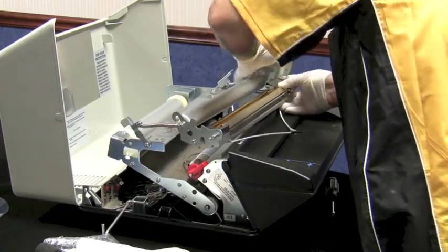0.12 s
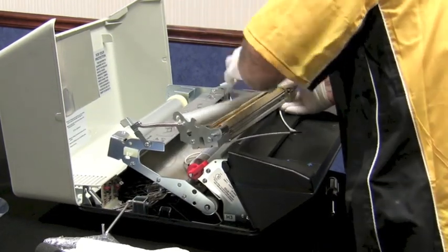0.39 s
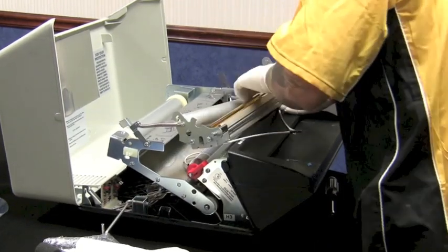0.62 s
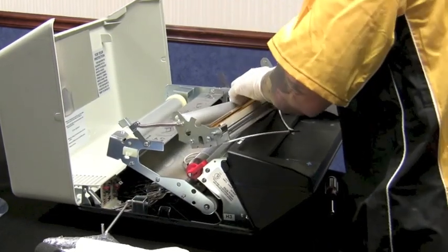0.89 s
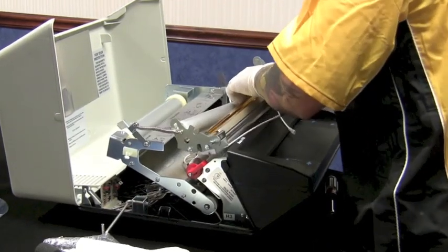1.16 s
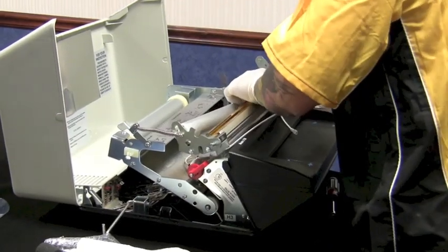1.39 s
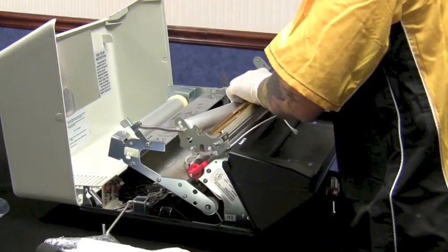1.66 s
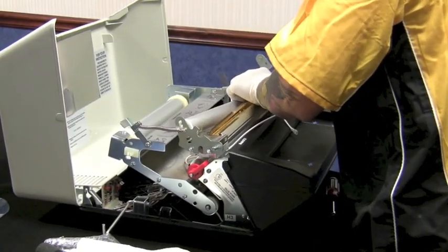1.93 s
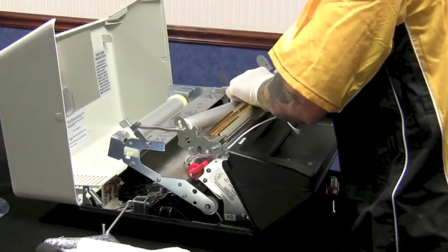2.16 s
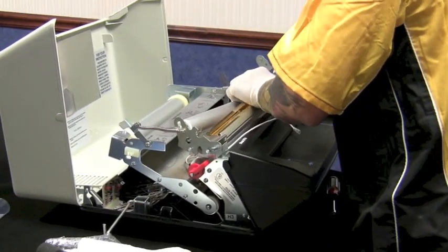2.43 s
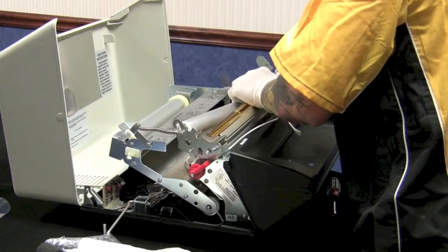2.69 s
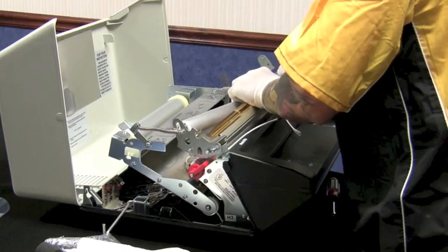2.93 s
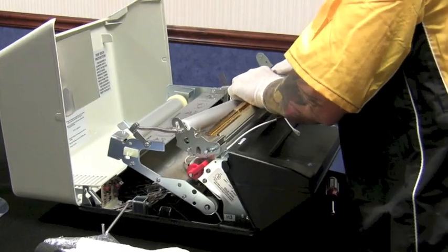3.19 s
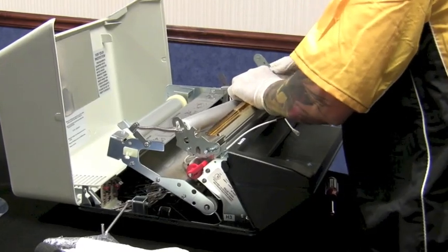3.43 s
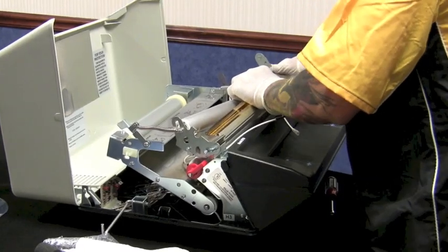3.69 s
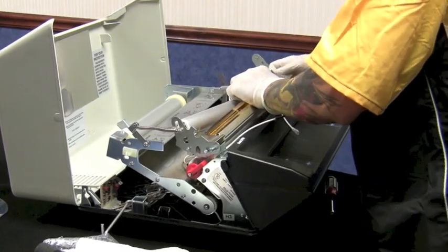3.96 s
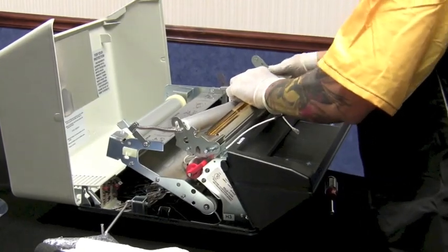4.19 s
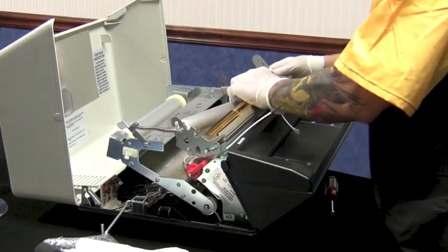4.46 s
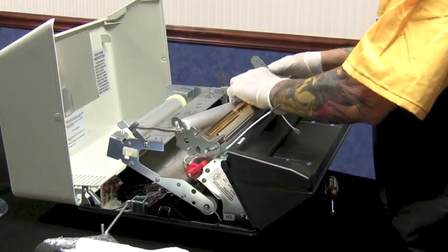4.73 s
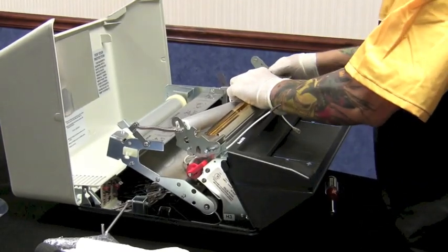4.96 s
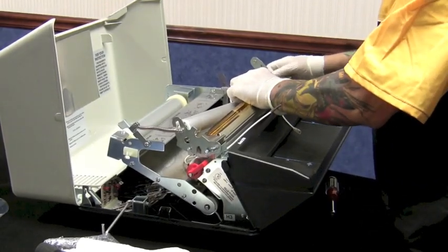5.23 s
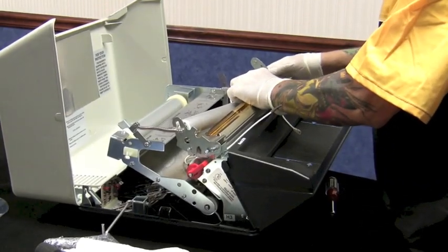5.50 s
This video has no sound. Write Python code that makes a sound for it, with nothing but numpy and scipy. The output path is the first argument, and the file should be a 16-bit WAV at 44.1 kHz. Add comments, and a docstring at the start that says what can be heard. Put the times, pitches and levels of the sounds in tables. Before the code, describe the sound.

Hands fit a roller assembly into an open metal machine. A rattle and scrape lead to a loud steel clank at half a second, then a lull, small ringing knocks, a busier cluster of clatter around two to three seconds, and sparse ticks afterwards. Close stereo pickup in a small carpeted room with soft ventilation and faint hum.

```python
"""A small carpeted room with ventilation noise, heard by a stereo microphone two metres from an open cabinet.
Gloved hands lower a roller assembly into the cabinet and seat it: sliding parts rub as gritty noise,
the roller and its brackets tick and rattle, the sheet cabinet knocks, a steel lever clanks, a tray rings.
Each blow is a rattling burst heard as a noise crack and as ringing modes; a bracket squeaks in a short glide.
The room adds a diffuse tail to the parts; the air is coloured noise over a wavering hum."""
import sys
import numpy as np
from scipy import signal
from scipy.fft import rfft, irfft
from scipy.io import wavfile
from scipy.ndimage import uniform_filter1d

SR = 44100
rng = np.random.default_rng(int(sys.argv[2]) if len(sys.argv) > 2 else 0)


def store_pcm(level_fs):
    """Save levels as 16-bit WAV."""
    pcm = np.round(np.clip(level_fs, -1, 1) * 32767).astype(np.int16)
    wavfile.write(sys.argv[1], SR, np.atleast_2d(pcm).T)


def voltage_ratio(decibels):
    """Convert decibels (scalar or array-like) to amplitude ratios, 20 dB per decade."""
    exponent = np.asarray(decibels, float) / 20
    return 10 ** exponent


N = 247401  # length of the scene in samples
RING = 24000  # samples kept of each ring and of the room tail


def unit(x):
    """Scales a sound to rms 1."""
    return x / np.sqrt(np.mean(x ** 2))


def at_hz(table, hz):
    """Reads a table of (frequency [Hz], value) on a log-frequency axis."""
    table_hz, value = np.transpose(table)
    return np.interp(np.log(hz + 1), np.log(table_hz), value)


def noise(table, size=N):
    """Noise of rms 1 with the table's colour."""
    hz = np.fft.rfftfreq(size, 1 / SR)
    spectrum = rfft(rng.standard_normal(size)) * voltage_ratio(at_hz(table, hz))
    return unit(irfft(spectrum, size))


def walk(rate):
    """Random levels held 1 / rate seconds and slewed twice; spread near 1."""
    k = int(SR / rate)
    steps = np.repeat(rng.standard_normal(N // k + 1), k)
    return 1.4 * uniform_filter1d(uniform_filter1d(steps, k), k)[:N]


def near(hz, centre, octaves):
    """A bell around a centre frequency, its width in octaves."""
    return np.exp(-.5 * (np.log2(hz / centre) / octaves) ** 2)


def peak(x):
    """Highest short-term rms, over 150 samples."""
    return np.sqrt(uniform_filter1d(x ** 2, size=150).max())


def strike(blows, modes, split, scatter_db, rise_s, grain_db, crack_oct, focus_oct):
    """Each blow is a short uneven rattle: heard as a crack, and ringing the part's modes."""
    hz, mode_db, t60 = np.repeat(np.transpose(modes), repeats=3, axis=1)
    # an imperfect part splits every mode into close neighbours that beat
    hz = hz * (1 + split * rng.standard_normal(len(hz)))
    t = np.arange(RING) / SR
    rings = np.exp(np.outer(2j * np.pi * hz - np.log(1000) / np.clip(t60, .02, .8), t))
    bins = np.fft.rfftfreq(RING, 1 / SR) + 1
    out = np.zeros(N + 2 * RING)
    for s, db, ring_hz, centre, rattle, ring_db in blows:
        # the contact chatters: a decaying push broken into millisecond grains
        grain_levels = np.repeat(rng.standard_normal(RING // 40), 40)
        grains = uniform_filter1d(voltage_ratio(grain_db * grain_levels), size=20)
        rise = 1 - np.exp(-t / (rise_s + 0.11 * rattle))
        push = rise * np.exp(-t / max(rattle, .0005)) * grains

        # the crack is the broader the harder the blow, lifted where the touched piece resonates
        broad = near(bins, 1000 * 2 ** centre, crack_oct * voltage_ratio(0.027 * (db + 24.0)))
        colour = broad + 0.86 * near(bins, ring_hz, 0.16)
        crack = push * unit(irfft(rfft(rng.standard_normal(RING)) * colour, RING))

        # a harder blow reaches more of the modes; dividing by the drive evens out the chatter's spectrum
        force = push * rng.standard_normal(RING)
        drive = np.interp(hz, bins, np.abs(rfft(force))) / np.linalg.norm(force)
        reach = near(hz, ring_hz, focus_oct * voltage_ratio(0.61 * (db + 31.0)))
        level_draw, phase_draw = rng.standard_normal((2, len(hz)))
        gains = voltage_ratio(mode_db + scatter_db * level_draw) * (reach + 0.024)
        gains = gains * np.exp(2j * phase_draw) / (drive + 0.09)
        ring = signal.fftconvolve(force, (gains @ rings).imag)[:RING]

        sound = crack / peak(crack) + voltage_ratio(ring_db) * ring / peak(ring)
        start = int(s * SR)
        out[start:start + RING] += voltage_ratio(db) * sound / peak(sound) / 2
    return out[:N]


# ventilation colour in the middle: (frequency [Hz], relative level per Hz [dB])
AIR_COLOUR = [(53, -36), (90, -13.5), (151, 2), (316, -2.5), (521, -4), (593, -0.5), (1290, -11),
              (3660, -18.5), (11300, -30), (14300, -37), (16000, -58)]
# width of the ventilation noise: (frequency [Hz], side over mid [dB])
AIR_WIDTH = [(30, -5), (60, 17), (130, 6), (300, 12), (700, 5), (1500, 7), (3000, 4.5), (7000, -4.5),
             (15000, 1)]
# mains hum as a narrow hump of noise: (frequency [Hz], relative level per Hz [dB])
HUM_COLOUR = [(20, -22), (42, -18), (54, -15), (60, 2.5), (67, -11.5), (95, -9), (130, -32)]
AIR_DB, HUM_DB, HUM_SIDE_DB = -54, -66.5, 5  # rms of air and hum in the middle; hum's side over mid


def air():
    """Ventilation noise over a wavering mains hum, each with independent mid and side."""
    hz = np.fft.rfftfreq(N, 1 / SR)
    side_colour = [(f, db + at_hz(AIR_WIDTH, f)) for f, db in AIR_COLOUR]
    mid_power = np.mean(voltage_ratio(2 * at_hz(AIR_COLOUR, hz)))
    side_power = np.mean(voltage_ratio(2 * at_hz(side_colour, hz)))
    side = np.sqrt(side_power / mid_power) * noise(side_colour)
    ventilation = voltage_ratio(AIR_DB) * np.array([noise(AIR_COLOUR), side])
    hum_colour = HUM_COLOUR + [(300, -90)]
    hum = np.array([noise(hum_colour), noise(hum_colour)])
    return ventilation + voltage_ratio([[HUM_DB], [HUM_DB + HUM_SIDE_DB]]) * hum


# sliding strokes: (time of full pressure [s], hold [s], rubbing hiss level [dB], cabinet shudder level [dB])
SLIDING_STROKES = [(0, 0.0053, -34, -48.5), (0.247, 0.037, -48.5, -51.5), (.48, .01, -50, -55),
                   (.6, .05, -53.5, -52.5), (1.175, .06, -46, -45), (1.645, .05, -65, -50),
                   (1.8, .08, -56, -56), (2.0, .08, -52, -55), (2.165, .06, -34, -47),
                   (2.24, .04, -41, -50), (2.45, .09, -52, -53), (2.63, 0.064, -43.5, -49.5),
                   (2.8, .04, -53, -58), (2.97, .08, -51, -65), (3.115, .03, -55, -46),
                   (3.165, .05, -37, -50), (3.44, .04, -52, -65), (3.55, .08, -54, -68),
                   (3.68, .14, -51, -56), (4.07, .11, -50, -54), (4.22, .03, -52, -55),
                   (4.42, .04, -55, -62), (4.48, .07, -48, -69), (4.592, .02, -46, -47),
                   (4.952, .12, -49.5, -56), (5.14, .05, -53, -55.5), (5.31, .05, -54, -56),
                   (5.42, .045, -40, -55)]
PRESS_DB_PER_S = 500  # rise of a stroke


def pressure(level_db, fall_db_per_s):
    """Every stroke swells, holds and eases off; overlapping strokes add in power."""
    s, hold = np.transpose(SLIDING_STROKES)[:2, :, None]
    t = np.arange(N) / SR - s
    rise_db = PRESS_DB_PER_S * np.minimum(t, 0)
    fall_db = fall_db_per_s * np.maximum(t - hold, 0)
    return np.sqrt(np.sum(voltage_ratio(2 * (level_db[:, None] + rise_db - fall_db)), axis=0))


def damped_ring(modes, t60_factor):
    """A part's modes ringing together, damped to a fraction of their free decay time."""
    t = np.arange(RING) / SR
    return sum(voltage_ratio(db) * np.sin(2 * np.pi * hz * t) * np.exp(-np.log(1000) * t / (t60_factor * t60))
               for hz, db, t60 in modes)


# colour of the rubbing hiss: (frequency [Hz], relative level per Hz [dB])
RUB_COLOUR = [(350, -4.5), (600, -5), (1230, -13), (1700, -12.5), (4710, -23.5), (9350, -26), (13500, -32),
              (15800, -38)]
EASE_DB_PER_S, SETTLE_DB_PER_S = 150, 70  # fall of a stroke's hiss; fall of its shudder


def slide():
    """Rubbing is gritty hiss; the same contact shakes the cabinet's modes."""
    hiss_db, shudder_db = np.transpose(SLIDING_STROKES)[2:]
    grit = unit(noise(RUB_COLOUR) * voltage_ratio(0.58 * walk(300) + 4.9 * walk(30)))
    # sparse catches in the grit make the roller jingle faintly
    catches = rng.standard_normal(N) * voltage_ratio(7.2 * rng.exponential(size=N)) * (rng.random(N) < .01)
    jingle = signal.fftconvolve(np.tanh(catches / 30), damped_ring(ROLLER_MODES, 0.39))[:N]
    grit = unit(grit + voltage_ratio(-17) * unit(jingle))
    shaking = rng.standard_normal(N) * voltage_ratio(4.1 * walk(40))
    shudder = unit(signal.fftconvolve(shaking, damped_ring(CABINET_MODES, 0.48))[:N])
    return pressure(hiss_db, EASE_DB_PER_S) * grit + pressure(shudder_db, SETTLE_DB_PER_S) * shudder


# roller blows: (time [s], relative level [dB], frequency ringing most [Hz],
# crack centre above 1 kHz [octaves], ring against crack [dB])
ROLLER_HITS = [(.001, -24.5, 5830, 1.9, -10.5), (.1116, -35.5, 2750, 1.8, -5),
               (0.2073, -33.5, 3760, 1.2, -12), (0.2572, -41, 3870, .63, -22), (.2874, -44, 3810, 2.8, -15),
               (.4354, -48, 5800, 3.2, -5), (.8679, -51, 5870, 1.6, -9), (.8874, -40.5, 2440, 0.89, -7),
               (1.1361, -35.5, 6600, 1.3, -14), (1.1626, -26, 1940, 1.3, -20), (1.261, -45, 6700, 1.8, -16),
               (1.3099, -41.5, 6100, 1, -16), (1.4865, -40, 2630, 1.1, -23), (1.942, -46, 2690, 2.4, -4),
               (2.065, -39, 2290, 2.9, -8), (2.1353, -15.5, 3660, 1.5, -6), (2.1694, -24.5, 3640, 0.58, -3),
               (2.196, -27, 5100, 1.6, -17), (2.4319, -35.5, 3300, 1.6, -12), (2.575, -29.5, 3640, 2, -7),
               (2.6343, -29.5, 3530, 1.5, -6), (2.6665, -31, 2390, 1.3, -18), (2.7731, -37, 7980, 1, -15),
               (2.821, -40.5, 5660, 0.78, -8), (2.8944, -35, 3730, 1.45, -17), (2.974, -38, 9380, 2.8, -10),
               (3.15, -22, 5600, 1.87, -6), (3.157, -19, 7200, 2.5, 0), (3.19, -23, 6000, 1.57, -20),
               (3.4294, -29, 2120, 1.22, -24), (3.487, -40, 2410, 1.5, -15),
               (3.7753, -43.5, 9610, 1.7, -12), (3.8206, -39, 3480, 0.78, -27),
               (3.8728, -46, 4370, 1.7, -24), (4.0377, -44, 3650, 1.6, -19), (4.0996, -46, 2670, 2.3, 0),
               (4.1734, -44, 2800, 1.7, -14), (4.2106, -42, 2570, 2.3, -18), (4.4722, -41, 2600, 1.4, -16),
               (4.5731, -26.5, 2140, .82, -14), (4.721, -37.5, 5200, 1.4, -5),
               (4.9422, -46, 3660, 1.7, -13), (4.9802, -34.5, 2530, 0.84, -17),
               (5.0794, -47, 9400, 4.1, -9), (5.2998, -34, 2660, 1.4, -16), (5.4051, -28, 2400, 1.4, -11),
               (5.4562, -33, 4500, 2, -17)]
# dry ticks, single brief contacts: # (time [s], relative level [dB], frequency ringing most [Hz], crack centre
# above 1 kHz [octaves])
DRY_TICKS = [(.2205, -37, 9600, 2.6), (1.4022, -40, 10700, 3.1), (1.4122, -34.5, 8550, 3.1),
             (1.6314, -38, 2380, 2.6), (2.4544, -35, 9000, 2.9), (2.9562, -34, 9610, 2.4),
             (3.034, -29.5, 2350, 1.05), (3.663, -30, 2300, .95), (3.718, -41, 5100, 2.1),
             (5.1173, -36.5, 3220, 2.1)]
# roller modes: (frequency [Hz], relative level [dB], free decay by 60 dB [s])
ROLLER_MODES = [(1950, -9, .07), (2290, -6, .07), (2640, -8, .08), (3260, -10, .1), (3400, -9, .14),
                (3590, -3, .16), (3680, -4, .16), (4620, -10, .13), (5360, -11, .18), (5520, -12, .13),
                (5940, -12, .1), (6760, -6, .2), (7470, -11, .15), (7660, -10, .18), (7890, -6, .22),
                (8800, -10, .14), (9640, -11, .15), (9940, -11, .18), (11140, -10, .2), (11540, -15, .12),
                (12430, -17, .1)]
ROLLER_RATTLE_S, HARD_BLOW_DB, REBOUND_S_PER_DB = 0.0083, -28, .0009  # harder blows rattle longer
TICK_RATTLE_S, TICK_RING_DB = .003, -23  # rattle decay; ring against crack


def roller():
    """The roller and its brackets rattle, longer after hard blows, and tick drily in the treble."""
    blows = []
    for s, db, hz, crack, ring in ROLLER_HITS:
        rattle = ROLLER_RATTLE_S + REBOUND_S_PER_DB * max(db - HARD_BLOW_DB, 0)
        blows.append((s, db, hz, crack, rattle, ring))
    blows += [(s, db, hz, crack, TICK_RATTLE_S, TICK_RING_DB) for s, db, hz, crack in DRY_TICKS]
    return strike(blows, ROLLER_MODES, split=0.0097, scatter_db=3.5, rise_s=0.0007, grain_db=4.1,
                  crack_oct=1.05, focus_oct=0.54)


# cabinet knocks: (time [s], relative level [dB], frequency ringing most [Hz], rattle decay [s])
CABINET_KNOCKS = [(.009, -38, 650, 0.0068), (.249, -40, 991, .012), (.499, -22, 1010, .024),
                  (1.163, -29, 554, 0.027), (1.219, -31.5, 346, 0.018), (1.489, -37, 690, .03),
                  (1.961, -24.5, 504, 0.011), (2.143, -22, 420, .02), (2.205, -18, 352, 0.017),
                  (2.48, -33.5, 510, .016), (2.573, -26.5, 700, 0.02), (2.666, -32.5, 990, 0.028),
                  (3.107, -27.5, 660, 0.0053), (3.159, -27.5, 620, 0.0097), (3.289, -43.5, 156, .006),
                  (4.049, -34, 950, 0.034), (4.212, -34, 982, .012), (4.315, -37, 158, 0.027),
                  (4.474, -33, 1020, 0.0076), (4.573, -32.5, 1040, .01), (4.976, -35, 686, 0.028),
                  (5.059, -36, 332, 0.02), (5.159, -42, 704, .013), (5.349, -39, 224, 0.018),
                  (5.411, -30, 1010, .017), (5.459, -38, 680, .018)]
# cabinet modes: (frequency [Hz], relative level [dB], free decay by 60 dB [s])
CABINET_MODES = [(157.6, 0.5, 0.29), (234.3, -6, 0.35), (268, -15.5, 0.46), (304.2, -6, 0.46),
                 (346.2, 2, 0.23), (431, -5.5, 0.11), (481, -2, 0.13), (557.6, -2, 0.22), (614.6, -2, 0.29),
                 (686, 4, 0.17), (840, -4.5, 0.2), (994, -0.5, 0.17)]
CABINET_CRACK_OCT, CABINET_RING_DB = -1.14, -2  # crack centre above 1 kHz; ring against crack


def cabinet():
    """The sheet cabinet knocks: low cracks and the low modes of its panels."""
    blows = [(s, db, hz, CABINET_CRACK_OCT, rattle, CABINET_RING_DB) for s, db, hz, rattle in CABINET_KNOCKS]
    return strike(blows, CABINET_MODES, split=0.0092, scatter_db=4.4, rise_s=0.0025, grain_db=3.1,
                  crack_oct=1.24, focus_oct=0.71)


# lever blows: (time [s], relative level [dB], frequency ringing most [Hz],
# crack centre above 1 kHz [octaves], ring against crack [dB])
LEVER_CLANKS = [(.138, -22.5, 1900, .6, -2), (.467, -34, 3580, 1, -26), (.499, -6.5, 1900, .8, .3),
                (0.521, -29, 3040, .72, -1), (.546, -27, 5350, .89, -4), (.743, -45.5, 3800, 0.79, -8)]
# lever modes: (frequency [Hz], relative level [dB], free decay by 60 dB [s])
LEVER_MODES = [(1370, -4, .07), (1460, -4, .12), (1600, -6, .12), (1668, -5, .15), (2100, -10, .08),
               (2770, -13, .15), (3578, -10, .2), (3700, -5, .2), (3757, -4, .22), (3850, -8, .2),
               (3935, -8, .2), (4550, -18, .15), (4970, -17, .15), (5352, -14, .33), (5950, -15, .15),
               (6514, -13, .19), (6740, -16, .15), (7526, -19, .14), (8130, -23, .13), (9010, -21, .15),
               (11300, -25, .17)]
LEVER_RATTLE_S = 0.0072


def lever():
    """The steel lever clanks: a crack over dense modes from 1.4 kHz up."""
    blows = [(s, db, hz, crack, LEVER_RATTLE_S, ring) for s, db, hz, crack, ring in LEVER_CLANKS]
    return strike(blows, LEVER_MODES, split=0.0051, scatter_db=0.8, rise_s=0.00071, grain_db=4.3,
                  crack_oct=1.29, focus_oct=1.0)


# tray knocks: (time [s], relative level [dB], frequency ringing most and crack centre [Hz],
# ring against crack [dB])
TRAY_KNOCKS = [(1.515, -31.5, 720, 14), (1.55, -32.5, 720, 14), (1.642, -25.5, 1000, 5),
               (1.79, -32.5, 500, 4), (1.961, -25, 1400, -3), (2.05, -39, 2300, -10)]
# tray modes: (frequency [Hz], relative level [dB], free decay by 60 dB [s])
TRAY_MODES = [(522, -3, .65), (556, -6, .3), (650, 3, .18), (905, -16, .12), (958, -16, .12),
              (1357, -5, .18), (1491, -8, .1), (2309, -3, .17), (2660, -12, .1), (3397, -5, .17),
              (4200, -9, .12)]
TRAY_RATTLE_S = .009


def tray():
    """The tray rings: most knocks are more ring than crack, both around the same pitch."""
    blows = [(s, db, hz, np.log2(hz / 1000), TRAY_RATTLE_S, ring) for s, db, hz, ring in TRAY_KNOCKS]
    return strike(blows, TRAY_MODES, split=0.0016, scatter_db=1.5, rise_s=0.0024, grain_db=4.7,
                  crack_oct=.9, focus_oct=.45)


# bracket slip: (time [s], start frequency [Hz], end frequency [Hz], glide [s], fade [s], level [dB])
BRACKET_SLIP = (2.422, 2750, 3400, .012, .035, -42)


def squeak():
    """A bracket slips under load: a thin unsteady note gliding up and fading."""
    s, start_hz, end_hz, glide, fade, db = BRACKET_SLIP
    t = np.clip(np.arange(N) / SR - s, 0, None)
    hz = end_hz + (start_hz - end_hz) * np.exp(-t / glide) + 70 * walk(540)
    note = np.sin(2 * np.pi * np.cumsum(hz) / SR)
    swell = (1 - np.exp(-t / 0.0085)) * np.exp(-t / fade)
    return voltage_ratio(db + 3.1 * walk(400)) * swell * note


# room decay: (frequency [Hz], decay by 60 dB [s])
ROOM_DECAY = [(100, 0.47), (400, 0.3), (2000, 0.28), (12000, 0.29)]
# width of the room tail: (frequency [Hz], side over mid at the tail's start [dB])
ROOM_WIDTH = [(100, 0), (300, -7), (1000, -5), (4000, 1), (14000, 0.5)]
ROOM_DB = -5.5  # energy of the mid tail against the direct sound


def room(x, onset_s=0.008):
    """A diffuse tail whose decay time varies with frequency, one for mid and one for side."""
    t = np.arange(RING) / SR
    tails = np.zeros((2, RING))
    for hz in 60 * 2 ** np.arange(0, 8.5, .5):
        edges = [hz / 2 ** .25, min(hz * 2 ** .25, .45 * SR)]
        sos = signal.butter(2, edges, "band", fs=SR, output="sos")
        band = signal.sosfilt(sos, rng.standard_normal((2, RING)))
        band = band * np.exp(-np.log(1000) * t / at_hz(ROOM_DECAY, hz))
        tails += band * voltage_ratio([[0], [at_hz(ROOM_WIDTH, hz)]])
    tails *= 1 - np.exp(-(t / onset_s) ** 2)
    tails /= np.linalg.norm(tails[0])
    return signal.fftconvolve(x[None], tails, axes=1)[:, :N] * voltage_ratio(ROOM_DB)


LEFT_DB = 0.7  # left channel over right


def scene():
    """The parts carry no deep bass; the room and the air widen the picture."""
    parts = slide() + roller() + cabinet() + lever() + tray() + squeak()
    parts = signal.sosfilt(signal.butter(4, 140, "high", fs=SR, output="sos"), parts)
    direct = np.array([parts, 0 * parts])
    mid, side = air() + direct + room(parts)
    return np.array([mid + side, mid - side]) * voltage_ratio([[LEFT_DB / 2], [-LEFT_DB / 2]])


def roll_off(x):
    """The treble ends steeply here."""
    return signal.sosfilt(signal.butter(12, 16120, fs=SR, output="sos"), x)


def record(dry):
    """A steep low-pass at 16.1 kHz cuts the top of the mix."""
    top_cut = signal.ellip(8, .2, 70, 16100, fs=SR, output="sos")
    mix = signal.sosfilt(top_cut, dry)
    return roll_off(mix)


dry = scene()
out = record(dry)
store_pcm(out)
```